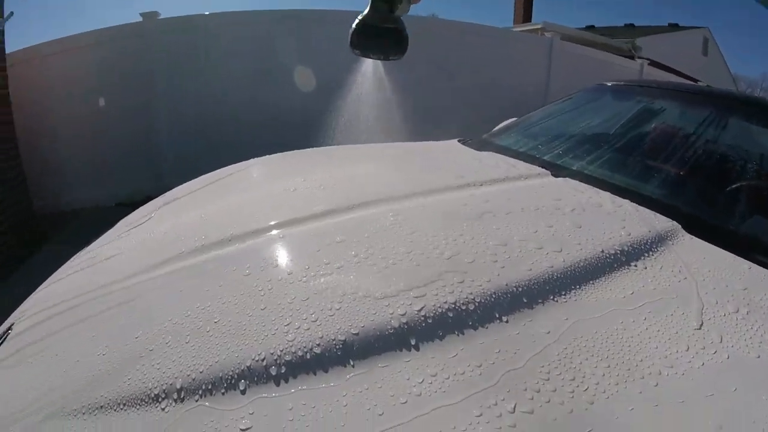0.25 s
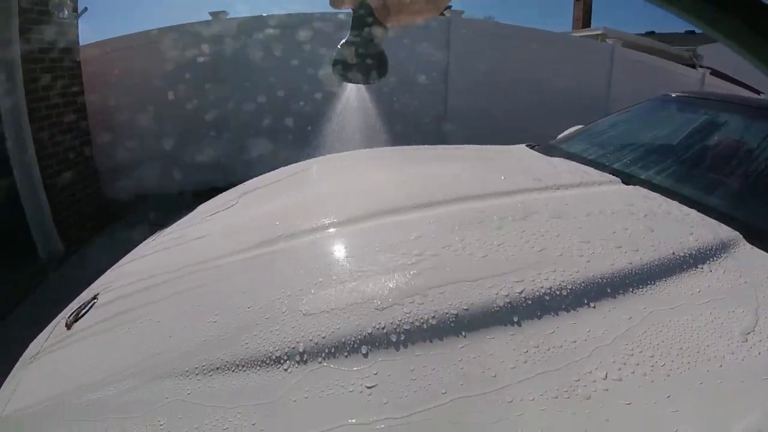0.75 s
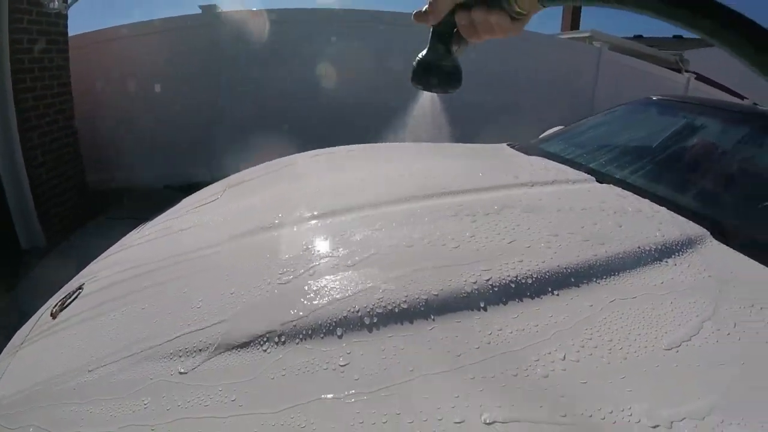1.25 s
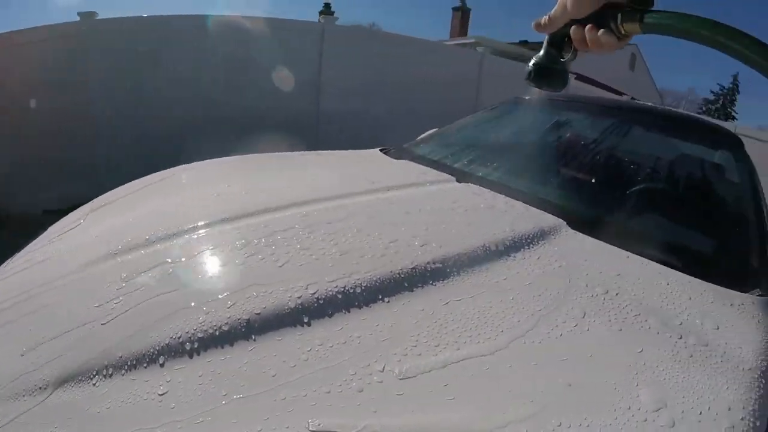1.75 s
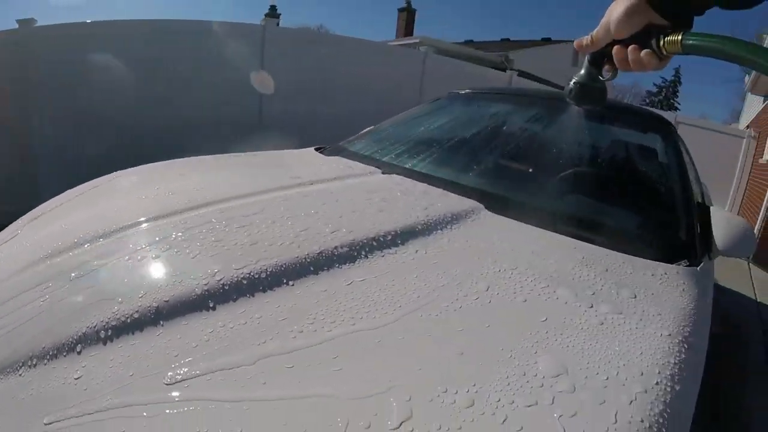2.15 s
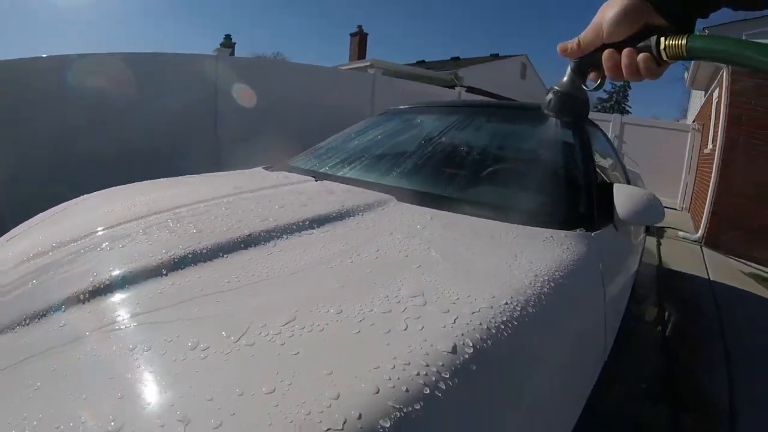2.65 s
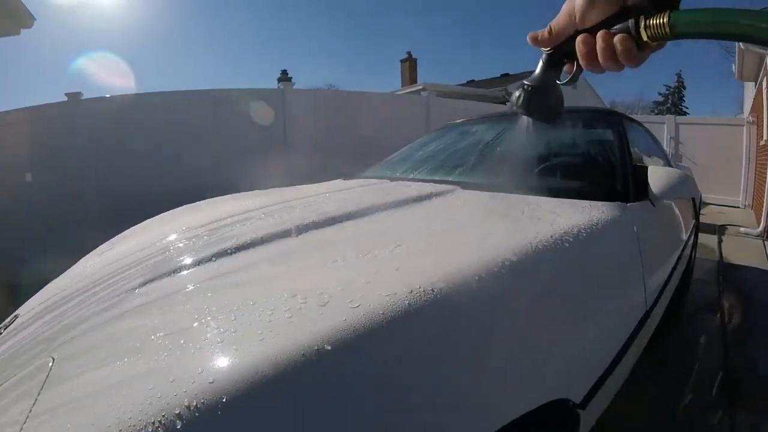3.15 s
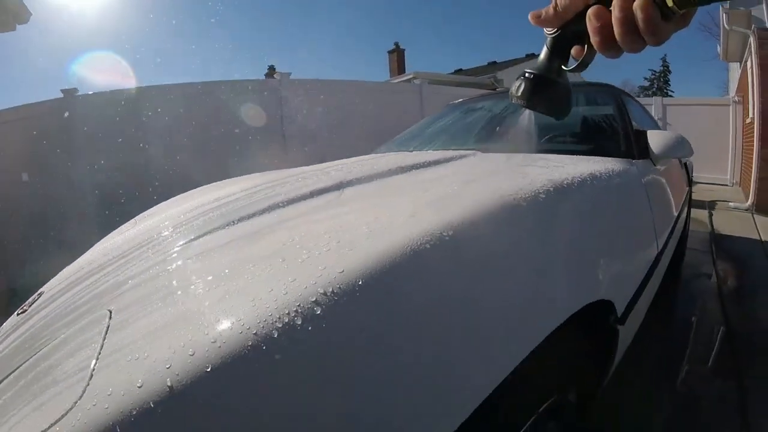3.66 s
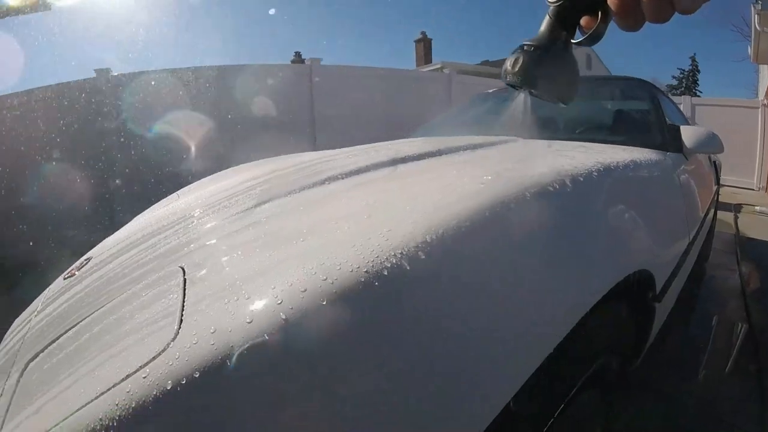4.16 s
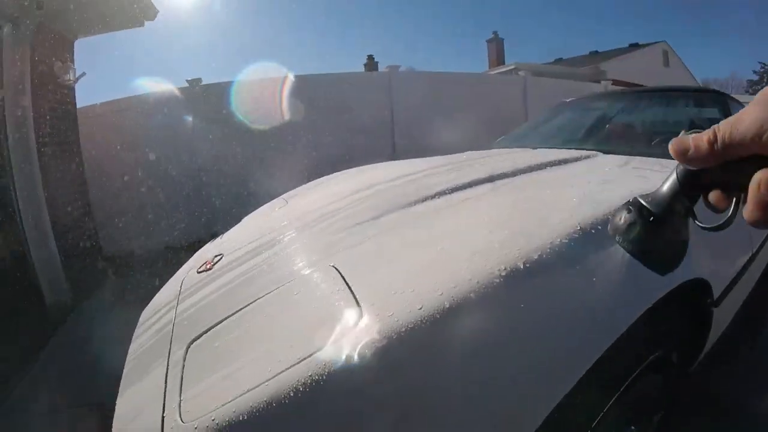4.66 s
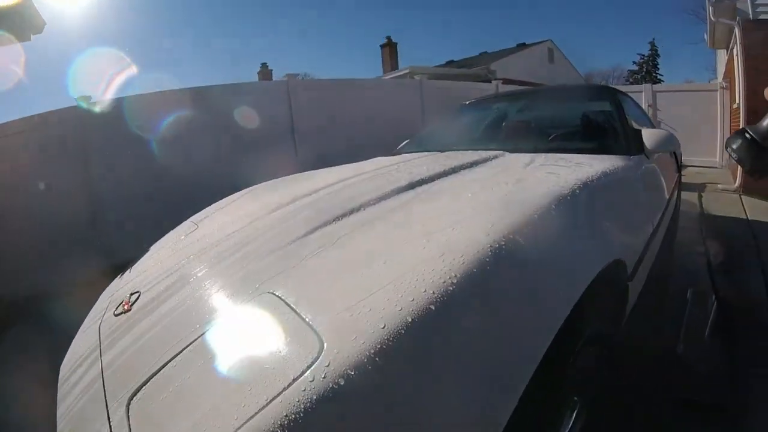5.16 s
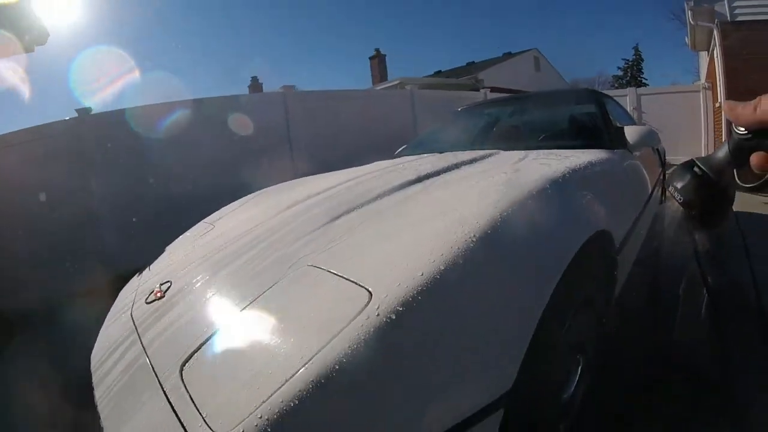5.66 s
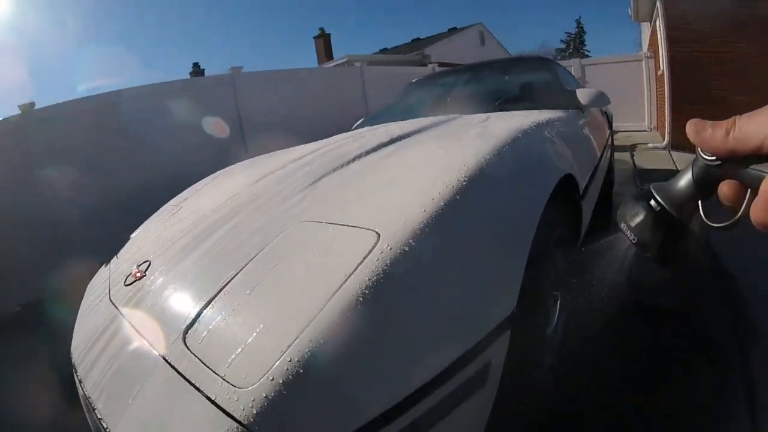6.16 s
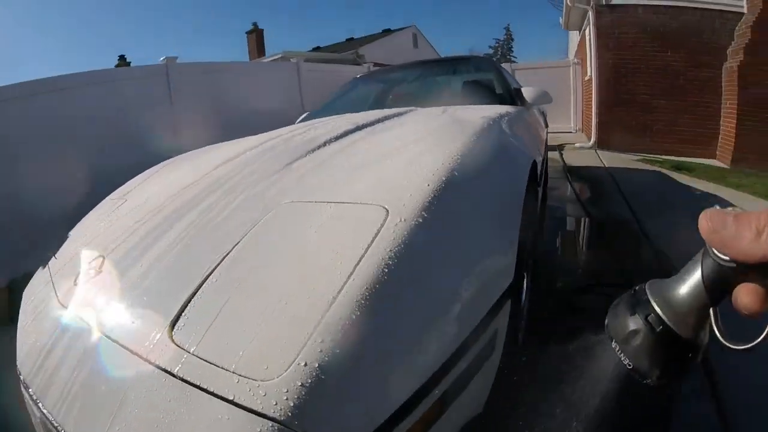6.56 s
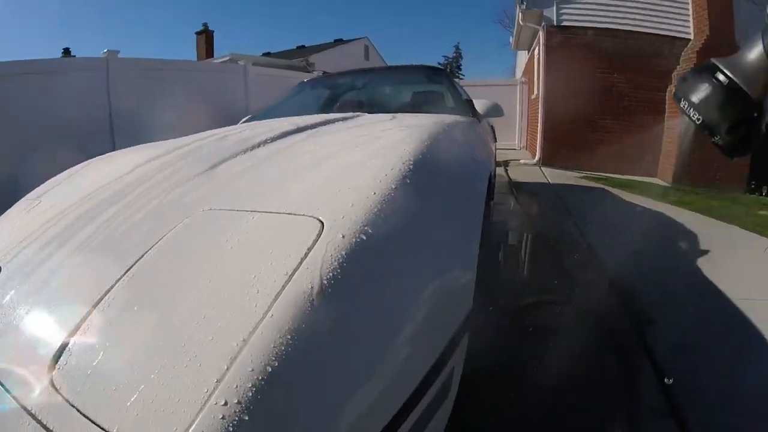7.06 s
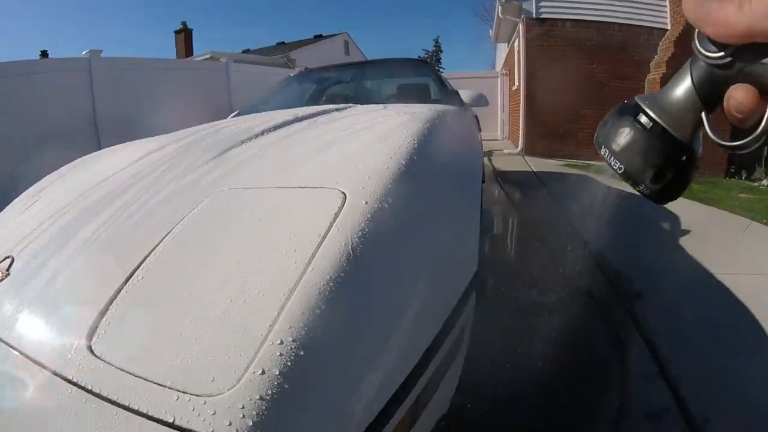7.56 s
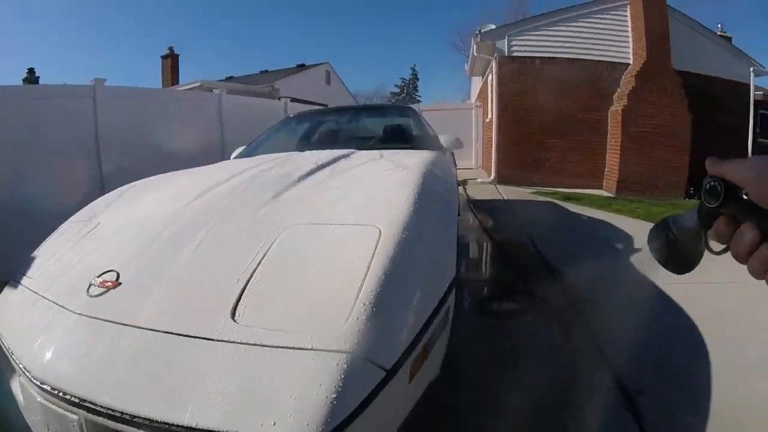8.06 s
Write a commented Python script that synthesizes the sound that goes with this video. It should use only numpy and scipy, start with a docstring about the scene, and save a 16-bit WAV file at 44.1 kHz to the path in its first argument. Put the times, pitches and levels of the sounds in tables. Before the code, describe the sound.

Continuous bright water-spray hiss, its hollow tone shifting as the nozzle moves, over soft wind buffeting, low hum and a distant accelerating engine.

```python
"""From the start a hand-held hose nozzle hisses fine mist over a car hood: filtered noise, with hollow rings
from the nozzle head. The hood throws the hiss back late, a comb that slides as nozzle and microphone move.
Under it far roads wash, a mains-driven machine hums in sine tones and wind noise buffets the microphone.
A far car's roar comes and goes, a faint moan swells and fades, and decaying tones make one rattling knock.
Then a far engine climbs through two gears as three sine orders, and a rising chirp makes a drop plink."""
import sys
import numpy as np
from scipy import signal
from scipy.io import wavfile
from scipy.ndimage import uniform_filter1d

SR = 44100
rng = np.random.default_rng(int(sys.argv[2]) if len(sys.argv) > 2 else 0)


def transcribe(u):
    """Save the signal u as a 16-bit wav file named by the first command-line argument.

    u: samples, shape (n,) or (channels, n), limited to [-1, 1]; the rate is SR.
    q: integer samples, one column per channel.
    """
    v = np.clip(np.atleast_2d(u).T, -1, 1)
    q = np.round(v * 32767).astype(np.int16)
    wavfile.write(sys.argv[1], SR, q)


N = 366320  # length in samples

# Nozzle in the hand: start_s, level_db (base level of the whole spray), facing (head: 0 away, 1 to the
# microphone), lean_db (from the low ring to the middle ring), treble_db (over the base level)
NOZZLE_MOVES = [(0.0, -47.5, 1.01, 2.5, 2.5), (0.5, -48, 0.97, 1, 2), (1.1, -47.5, 1.04, 4.5, 4),
                (1.35, -47.5, 0.89, 4, 2), (1.55, -48, 0.81, 5.5, 1.5), (1.75, -49, 0.78, -2, -1),
                (1.9, -49.5, 0.97, -1, 0.6), (2.1, -49.5, 0.63, 1.5, 0.5), (2.3, -49.5, 0.58, 3, -0.5),
                (2.5, -48, 0.71, -0.2, 0.2), (2.65, -49, 0.3, 3, -0.1), (2.85, -50.5, 0.36, 2.4, 1),
                (3.0, -49, 0.07, 6, 0.7), (3.15, -48, 0.34, 2, -0.5), (3.35, -47.5, 0.13, 4.5, -0.5),
                (3.55, -46.5, 0.15, 7, 1), (3.85, -45.5, 0.24, 3, -1.0), (4.15, -44.9, 0.25, 4, 1.3),
                (4.3, -45, 0.35, 1, 2), (4.5, -43.5, 0.15, 2, 1.5), (4.6, -44, 0.28, -1, -1.5),
                (4.72, -46.5, 0.42, 2, -2.5), (4.85, -48.5, 0.37, 3, -1.2), (5.05, -50.2, 0.32, 2.5, -2.5),
                (5.2, -50, 0.57, 0.5, -1.6), (5.45, -47.5, 0.52, 0.5, -1.7), (5.65, -47.5, 0.46, -1, -4.1),
                (5.85, -47, 0.27, 5.5, -4.5), (6.05, -48, 0.5, 1, -2.7), (6.3, -46, 0.2, 4.5, -5.3),
                (6.5, -45.5, 0.44, 3, -2.5), (6.7, -45, 0.39, 4, -1.1), (6.9, -44.3, 0.26, 2.5, -5.5),
                (7.1, -46, 0.31, 1.5, -1.6), (7.35, -45, 0.3, -1, 0.5), (7.55, -44, 0.1, 2.5, -2),
                (7.7, -43.5, 0.07, 3.5, -3), (7.9, -46, 0.4, 2.5, -4.5), (8.0, -48.5, .45, 1, -4),
                (8.11, -48.5, 0.6, 0, -4.5), (8.18, -50.5, .5, -.5, -7), (8.31, -53, 0.4, 2, -5.5)]
# Spectrum shape of the broad jet hiss: pitch_hz, level_db (relative, per Hz)
JET_COLOUR = [(300, -9.5), (700, -7.5), (1200, -6), (1800, -1), (3000, 0.5), (4300, -1), (6000, -3.5),
              (8000, -4.5), (10000, -44), (12500, -60)]
# Spectrum shape of the treble: pitch_hz, level_db (relative, per Hz)
TREBLE_COLOUR = [(4000, -58), (6500, -4.5), (7600, 0.5), (9300, 0), (10200, -10), (11500, -50)]
# Spectrum shape of the top air: pitch_hz, level_db (relative, per Hz)
AIR_COLOUR = [(8500, -13.5), (10200, 0), (11500, 2.5), (12800, -7), (13300, -31), (16000, -42)]
# Level of the top air: time_s, level_db (over the base level of the spray)
AIR_LEVEL = [(0, -18), (.5, -19), (1.1, -14.5), (3.3, -14.5), (3.7, -10.5), (4.2, -12), (4.55, -10.5),
             (4.75, -14.5), (5.2, -13.5), (5.45, -12), (5.9, -12.5), (6.45, -17), (6.65, -24), (6.9, -15),
             (7.6, -13.5), (8.31, -15.5)]
# Resonances of the hollow nozzle head, low to high: pitch_hz, width_hz (both before they slide and narrow)
HEAD_RINGS = [(4870, 860), (5520, 1420), (6470, 550)]
# Each ring with the head turned away: level_db (over the base level)
RINGS_AWAY = [4, -1, -6]
# Each ring with the head turned to the microphone: level_db (over the base level)
RINGS_FACING = [2, 8.5, 13]
# How each ring follows lean_db: factor
RING_LEANING = [-1, 1, 0]
# Rings sliding as the head swings: time_s, low_shift_hz, middle_shift_hz, top_shift_hz,
# narrowing (factor on the widths of the lower two)
RING_SLIDING = [(2.55, 0, 0, 0, 0.48), (2.8, 0, -50, 0, 0.61), (3.05, 0, -50, 0, 0.75),
                (3.3, 0, 0, 0, 0.59), (3.6, 0, 50, 100, 0.86), (3.9, 0, 200, 100, 0.97),
                (4.17, 0, 200, 50, .8), (4.3, 100, -100, 50, 0.88), (4.45, 0, -250, 50, 0.75),
                (4.6, -350, -300, 0, 1), (4.75, -100, -100, 0, 1), (4.95, 0, 0, 0, 1), (5.25, 0, 0, 0, 1),
                (5.6, 0, 0, -30, 1), (5.9, 100, -250, 0, 0.8), (6.15, 0, 0, 120, 1),
                (6.45, 50, -150, 220, 0.74), (6.65, 0, -80, 200, 0.8), (6.85, -150, 0, 0, 0.73),
                (7.1, -50, 50, 50, 0.95), (7.3, 30, 50, 150, .6), (7.45, 50, 150, 0, 0.65),
                (7.58, 0, 280, 0, 0.73), (7.8, 0, 180, -30, 0.95), (7.95, -50, 50, 0, 0.91),
                (8.31, 0, 0, 0, 1)]
# Bounce off the hood: time_s, delay_ms, then base strengths 0-1: low_mist, nozzle_head, treble
HOOD_ECHO = [(0, 0.91, .5, .37, .5), (.15, 0.9, 0.6, .3, .5), (.45, 0.85, .62, .33, .55),
             (.75, 0.92, .45, 0.51, .5), (1.09, 0.87, 0.6, .35, .45), (1.22, 0.86, .48, .3, .55),
             (1.32, 0.8, .7, 0.09, .5), (1.45, .79, 0.6, 0.19, .55), (1.57, 0.77, 0.4, 0.18, 0.65),
             (1.72, 0.79, 0.45, 0.49, .5), (1.85, 0.77, .38, 0.46, .55), (1.97, 0.74, 0.4, .5, .6),
             (2.08, .69, 0.3, .33, .55), (2.2, 0.66, .45, .3, .55), (2.35, 0.6, .35, 0.35, .5),
             (2.5, 0.57, .33, 0.78, .5), (2.6, 0.58, .35, .6, .35), (2.7, 0.63, 0.2, .45, .2),
             (2.8, .715, 0.3, .3, .15), (2.9, 0.8, 0.2, .35, .1), (3.02, .815, .15, .45, .15),
             (3.12, 0.81, 0.1, .4, .1), (3.22, 0.71, 0.3, 0.37, .1), (3.37, .67, 0, .33, .05),
             (3.54, 0.58, .25, .35, .15), (3.72, 0.54, .24, 0.23, .15), (3.9, 0.57, 0.27, 0.36, .15),
             (4.1, .58, .18, 0.14, .05), (4.3, 0.74, .12, 0, .05), (4.6, 0.71, .1, 0, 0),
             (4.85, 1, .05, 0.037, .05), (5.02, .965, .15, .45, .05), (5.1, 1.02, 0.1, .55, .08),
             (5.2, 1.10, 0.2, .6, .1), (5.3, 1.19, 0.3, .4, .1), (5.45, 1.2, 0, 0.15, .05),
             (5.7, 1.45, 0, 0, 0)]
# The wet, curved sheet colours the bounce: pitch_hz, factor (on strength), phase_lead_rad
SHEET_COLOUR = [(1000, 0.81, 0.94), (2200, 0.98, 0.93), (2900, 1, 1.6), (3500, 1.3, 1.45),
                (4100, 1.15, 1.6), (4600, .91, 1.2), (5540, 1.1, 1.9), (6470, 0.5, 0.73), (6700, 1.2, 0.6),
                (8200, 0.83, 0.84), (10000, 0.82, 1.2)]
# Spectrum shape of the far traffic: pitch_hz, level_db (relative, per Hz)
ROADS_COLOUR = [(20, 0), (45, -1), (90, -6.5), (170, -8.5), (300, -15.5), (420, -24), (520, -15),
                (650, -21), (900, -20.5), (2000, -22), (6000, -59)]
# Machine tones: pitch_hz, level_db (rms before the sway and waver; the first takes its level from the sway)
HUM_TONES = [(120, -40), (174, -61), (240, -68.5), (360, -70)]
# Sway of the hum: time_s, level_db (rms of the loudest tone before its waver)
HUM_SWAYING = [(0, -43.5), (.45, -42.5), (.85, -41.5), (2.55, -44.5), (3., -42.5), (3.35, -45),
               (3.72, -41.5), (4.9, -46.5), (5.55, -46), (6.4, -49.5), (7.3, -45), (8.31, -48.5)]
# Spectrum shape of the wind: pitch_hz, level_db (relative, per Hz)
WIND_COLOUR = [(8, -0.5), (25, 4), (45, 5), (75, 0), (110, -4.5), (170, -18), (300, -26), (500, -91)]
# Steady turbulence: time_s, level_db (rms before the waver)
WIND_LEVEL = [(0, -39), (.2, -47.5), (.4, -42.5), (1., -44), (1.6, -54.5), (2.2, -50), (3., -39.5),
              (3.2, -46), (3.6, -39), (3.9, -52), (4.5, -40), (5., -50.5), (5.7, -47.5), (6.2, -45),
              (7.2, -49.5), (8.31, -47)]
# Buffets: centre_s, burst_db (before the waver), swing_db (height of its bell), pitch_hz, length_cycles
WIND_BUFFETS = [(0.576, -42, -27, 60, 1), (.791, -31, -34, 70, 1.5), (0.836, -29.5, -26, 60, 0.54),
                (1.777, -35, -28, 60, 0.99), (1.803, -45, -28.5, 105, 1.5), (2.08, -43, -42, 55, 1.5),
                (2.419, -42, -31, 45, .9), (2.445, -42, -30, 50, 1.2), (2.533, -35.5, -31, 55, 1.5),
                (2.66, -38, -36, 55, 1.6), (2.897, -43, -31, 50, 1.9), (3.259, -38.5, -37, 55, 1.3),
                (3.694, -29, -34, 55, 1.3), (3.812, -34, -21.5, 65, 0.47), (3.955, -33, -29, 60.4, 0.74),
                (4.06, -44, -30, 55.6, 0.62), (4.164, -28.5, -32, 60, 1.2), (4.844, -47, -21.5, 77, 0.68),
                (4.904, -33.5, -46, 55, 1.4), (5.156, -35.5, -33.5, 45, 1.5), (5.97, -37.5, -38, 55, 1.3),
                (6.172, -35, -29, 40, 1), (6.739, -41, -34, 65.4, 0.86), (7.009, -37, -31.5, 59.5, 1.2)]
# Spectrum shape of a far car's exhaust and tyres: pitch_hz, level_db (relative, per Hz)
CAR_COLOUR = [(150, -27), (240, 12), (320, 6.5), (450, -3), (600, -6), (900, -47)]
# Level of that car: time_s, level_db
CAR_LEVEL = [(0, -81), (1.2, -79), (2.2, -66), (3.3, -62), (4.5, -73), (5.5, -68), (6.2, -61), (6.9, -67),
             (7.5, -58.5), (8.31, -58)]
# Faint far moan: centre_s, half_length_s, pitch_hz, width_hz, level_db (at its fullest)
FAR_MOAN = (3.5, 0.7, 567, 160, -63)
# Blows of the dull rattling knock: start_s, strength_db
KNOCK_BLOWS = [(3.0855, -40), (3.0905, -43), (3.0985, -40.5), (3.117, -45), (3.124, -49), (3.138, -53),
               (3.155, -56)]
# Tones of the hollow body that is hit: pitch_hz, level_db (relative), fade_s (time to fall 60 dB)
KNOCK_BODY = [(341, -1, 0.055), (410, -3, .05), (468, 4.5, 0.065), (510, 2.5, .05), (620, 5, 0.039),
              (720, 2, 0.038), (866, -1, 0.04), (980, -3, 0.033)]
# Far engine's two gears: engaged_s, firing_hz (at that time), rise_hz_per_s
ENGINE_GEARS = [(4.8, 99.84, 5.5), (6.301, 82.86, 13.4)]
# Engine levels, rms before the waver: time_s, firing_tone_db, second_order_db
ENGINE_LEVEL = [(4.8, -70, -62), (5.2, -62, -56), (5.55, -44.5, -66), (5.9, -61, -68), (6.25, -55, -56.5),
                (6.5, -46.5, -75), (6.8, -44.5, -59), (7.1, -53, -67), (7.4, -47.5, -54.5), (7.8, -55, -61),
                (8.31, -44.5, -60)]
# Bubble left by a falling drop: start_s, length_s, start_hz, end_hz, peak_db
DROP_BUBBLE = (5.670, .016, 2600, 3200, -40.5)

RING_DRIFT_DB, RING_DRIFT_FRAMES = 0.4, 52
TOP_RING_AWAY = 0.7  # factor on the top ring's width, head turned away
ROADS_DB = -50.5
BURST_FALL_DB_PER_S = 218  # on both sides of a buffet's centre
SHIFT_S = 0.069  # time the change of gear takes
THIRD_ORDER_DB, THIRD_RISE_DB_PER_HZ = -5, 0.3  # over the second order at 100 Hz, in the last gear
THIRD_FIRST_GEAR_DB = -8  # the third order is weaker before the change of gear
EDGE_HZ = 15850


def gain_of(db):
    """Decibels to amplitude."""
    return 10 ** (np.asarray(db) / 20)


def evened(x):
    """Scales to rms 1."""
    return x / np.sqrt(np.mean(x ** 2) + 1e-20)


def colour(points, hz):
    """Amplitude of a spectrum table at the frequencies hz."""
    f, db = np.transpose(points)
    return gain_of(np.interp(np.log(hz + 1), np.log(f + 1), db))


def columns(table, t):
    """Reads the columns of a table at the points t of its first column."""
    s, *rest = np.transpose(table)
    return [np.interp(t, s, c) for c in rest]


def grid(size):
    """Frequencies as a column and frame times as a row, four frames to each size samples."""
    return np.fft.rfftfreq(size, 1 / SR)[:, None], np.arange(4 * N // size + 5) * size / 4 / SR


def noise(magnitude):
    """Noise from random short-time spectra; a magnitude of rms 1 over the bins gives rms 1."""
    a, b = rng.standard_normal(magnitude.T.shape + (2,)).T
    size = 2 * len(magnitude) - 2
    sound = signal.istft((a + 1j * b) * magnitude, nperseg=size, noverlap=3 * size // 4)[1][:N]
    return sound * np.sqrt(3 / size)  # makes up for the overlap of the frames


def waver(seconds):
    """Slow random drift of rms 1: noise averaged twice."""
    length = int(seconds * SR)
    return evened(uniform_filter1d(uniform_filter1d(rng.standard_normal(N), length), length))


def ring(hz, f, width):
    """Amplitude of noise through a steep resonance, at half height over the given width."""
    return 1 / (1 + (2 * (hz - f) / width) ** 2)


def nozzle_rings(hz, t, facing):
    """Shapes of the hollow head's resonances, which slide and narrow without losing power."""
    *slides_hz, narrow = columns(RING_SLIDING, t)
    top_narrow = TOP_RING_AWAY + (1 - TOP_RING_AWAY) * facing
    return [ring(hz, f + shift, width * k) / np.sqrt(k)
            for (f, width), shift, k in zip(HEAD_RINGS, slides_hz, [narrow, narrow, top_narrow])]


def hood_bounce(hz, t):
    """The late bounce strengthens some pitches and weakens others: a comb that slides with the delay."""
    delay_ms, low, head, high = columns(HOOD_ECHO, t)
    factor, lead = columns(SHEET_COLOUR, hz)
    # the head rules the band of the rings, the mist the band below, the treble the band above
    above = 1 / (1 + (7500 / (hz + 1)) ** 12)
    below = 0.9 / (1 + (hz / 3950) ** 14)
    strength = factor * (head + (low - head) * below + (high - head) * above)
    strength = np.clip(strength, 0, 1)
    bounce = strength * np.exp(1j * (lead - 2 * np.pi * hz * delay_ms * 1e-3))
    return abs(1 + bounce) / np.sqrt(1 + strength ** 2)


def spray(jet_share_db=2.5, patchy_db=0.82, flicker_db=0.29):
    """Noise of the broad jet, three rings, treble and top air, each heard direct and off the hood."""
    hz, t = grid(size=512)
    level_db, facing, lean_db, treble_db = columns(NOZZLE_MOVES, t)
    # each ring's level drifts slowly at random, apart from the others
    ring_drift = rng.standard_normal((len(t), len(HEAD_RINGS)))
    ring_drift = evened(uniform_filter1d(ring_drift, RING_DRIFT_FRAMES, axis=0)).T
    over_db = [away + (near - away) * facing + side * lean_db + RING_DRIFT_DB * drift
               for away, near, side, drift in zip(RINGS_AWAY, RINGS_FACING, RING_LEANING, ring_drift)]
    over_db += [treble_db] + columns(AIR_LEVEL, t)
    shapes = nozzle_rings(hz, t, facing)
    shapes += [colour(TREBLE_COLOUR, hz), colour(AIR_COLOUR, hz)]
    power = (evened(colour(JET_COLOUR, hz)) * gain_of(jet_share_db)) ** 2
    power = power + sum((evened(shape) * gain_of(db)) ** 2 for shape, db in zip(shapes, over_db))
    # small patches of pitch and time come out louder or softer
    patches = rng.standard_normal((len(t), len(hz))).T
    patches = uniform_filter1d(patches, size=5, axis=0)
    patches = evened(uniform_filter1d(patches, size=45, axis=1))
    # the jet sputters across all bands
    flicker = evened(uniform_filter1d(rng.standard_normal(len(t)), size=3))
    level = gain_of(level_db + patchy_db * patches + flicker_db * flicker)
    return noise(np.sqrt(power) * hood_bounce(hz, t) * level)


def far_roads():
    """Traffic far off blends into a steady low wash of noise."""
    hz, t = grid(size=2048)
    return noise(gain_of(ROADS_DB) * evened(colour(ROADS_COLOUR, hz)) + 0 * t)


def hum():
    """One fairly steady machine tone; the weak ones waver in pitch and come and go."""
    t = np.arange(N) / SR
    sway_db = columns(HUM_SWAYING, t)[0] - HUM_TONES[0][1]
    total = np.zeros(N)
    for k, (hz, db) in enumerate(HUM_TONES):
        if k == 0:
            tone_db = db + sway_db + 0.71 * waver(0.42)
            wobble_rad = 0.06
        else:
            tone_db = db + 0.5 * sway_db + 2.9 * waver(0.25)
            wobble_rad = 0.7
        phase = 2 * np.pi * (hz * t + rng.random()) + wobble_rad * waver(0.045)
        total += gain_of(tone_db) * np.sin(phase)
    return np.sqrt(2) * total  # a sine's peak is this much over its rms


def wind():
    """Lumpy low turbulence on the microphone, with a burst and a swing of pressure at each buffet."""
    hz, frames = grid(size=4096)
    t = np.arange(N) / SR
    level = gain_of(columns(WIND_LEVEL, t)[0])
    swings = np.zeros(N)
    for s, burst_db, swing_db, f, cycles in WIND_BUFFETS:
        near = slice(round((s - 0.15) * SR), round((s + 0.15) * SR))
        burst = gain_of(burst_db - BURST_FALL_DB_PER_S * abs(t[near] - s))
        level[near] = np.maximum(level[near], burst)
        turn = (t[near] - s) * f
        bell = np.exp(-(2 * turn / cycles) ** 2)
        swings[near] -= gain_of(swing_db) * bell * np.sin(2 * np.pi * turn + 0.5)
    turbulence = noise(evened(colour(WIND_COLOUR, hz)) + 0 * frames)
    return turbulence * level * gain_of(2.4 * waver(0.052)) + swings


def far_car():
    """Exhaust and tyres of one car: a band of low noise that swells, sinks and swells again."""
    hz, t = grid(size=2048)
    return noise(gain_of(columns(CAR_LEVEL, t)[0]) * evened(colour(CAR_COLOUR, hz)))


def moan():
    """Noise through one resonance, which swells and fades along a bell curve."""
    hz, t = grid(size=2048)
    s, half_s, moan_hz, width, db = FAR_MOAN
    swell = np.exp(-((t - s) / half_s) ** 2)
    return noise(gain_of(db) * swell * evened(ring(hz, moan_hz, width)))


def knock():
    """Soft blows, each a short smooth push that rings a hollow body."""
    t = np.arange(8192) / SR
    blows = np.zeros(N)
    for s, db in KNOCK_BLOWS:
        blows[round(s * SR):][:32] += gain_of(db) * np.hanning(32) / 16
    body = np.zeros(len(t))
    for k, (hz, db, t60) in enumerate(KNOCK_BODY):
        body += (-1) ** k * gain_of(db - 60 * t / t60) * np.sin(2 * np.pi * hz * t)
    return signal.oaconvolve(blows, body)[:N]


def engine():
    """Three low orders of the firing rate, blurred by distance; the rate climbs evenly in each gear."""
    t = np.arange(N) / SR
    low, high = [hz + rise * (t - s) for s, hz, rise in ENGINE_GEARS]
    shifted = np.clip((t - ENGINE_GEARS[1][0]) / SHIFT_S + 0.5, 0, 1)
    hz = low + (high - low) * shifted
    first_db, second_db = columns(ENGINE_LEVEL, t)
    third_db = second_db + THIRD_ORDER_DB + THIRD_RISE_DB_PER_HZ * (hz - 100)
    third_db = third_db + THIRD_FIRST_GEAR_DB * (1 - shifted)
    turns = np.cumsum(hz * (1 + 0.007 * waver(0.05))) / SR
    orders = [gain_of(db + 2.1 * waver(0.089)) * np.sin(2 * np.pi * order * turns)
              for order, db in enumerate([first_db, second_db, third_db], start=1)]
    return np.sqrt(2) * sum(orders) * (t > ENGINE_GEARS[0][0])


def drip():
    """The bubble's pitch rises as it nears the surface."""
    s, length, start_hz, end_hz, db = DROP_BUBBLE
    out = np.zeros(N)
    hz = np.linspace(start_hz, end_hz, round(length * SR))
    chirp = np.hanning(len(hz)) * np.sin(2 * np.pi * np.cumsum(hz) / SR)
    out[round(s * SR):][:len(hz)] = gain_of(db) * chirp
    return out


def scene():
    """All sources added at one microphone."""
    steady = spray() + far_roads() + hum() + wind()
    passing = far_car() + moan() + knock() + engine() + drip()
    return (steady + passing)[None]


def record(dry):
    """The recorder's band limit: a steep filter takes away what lies above the edge."""
    lowpass = signal.firwin(511, EDGE_HZ, window=("kaiser", 9), fs=SR)
    return signal.oaconvolve(dry, lowpass[None], "same")


dry = scene()
out = record(dry)
transcribe(out)
```